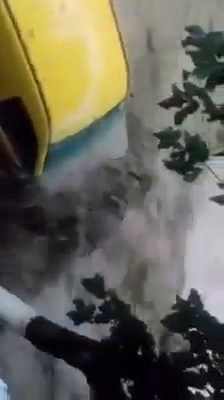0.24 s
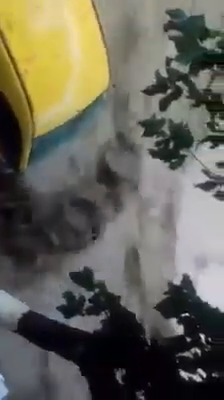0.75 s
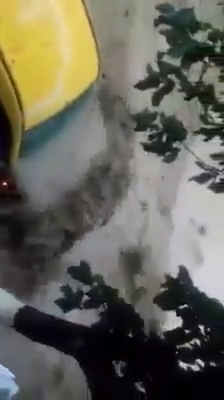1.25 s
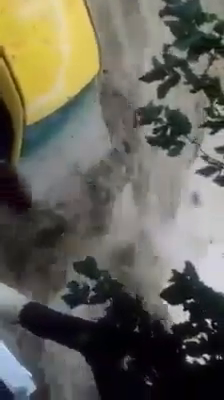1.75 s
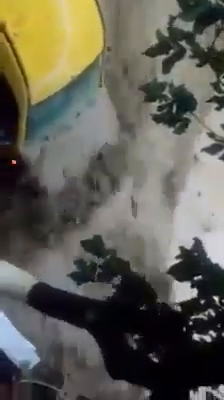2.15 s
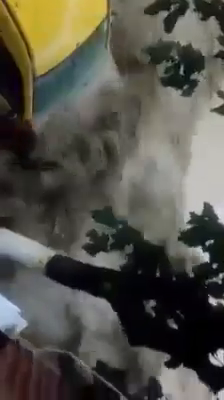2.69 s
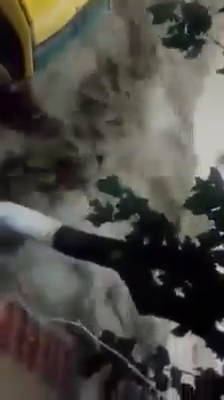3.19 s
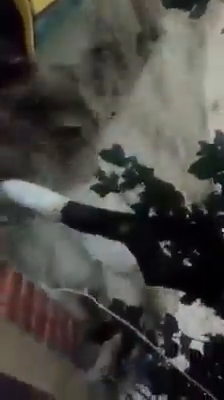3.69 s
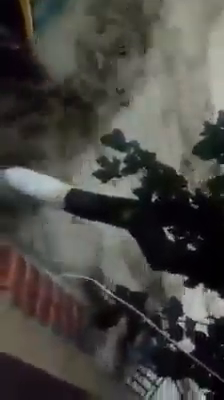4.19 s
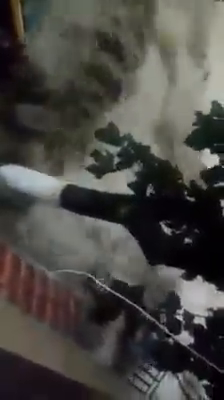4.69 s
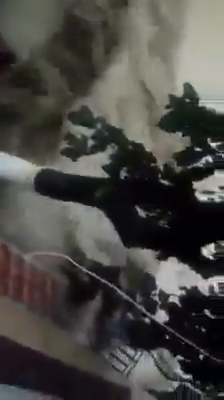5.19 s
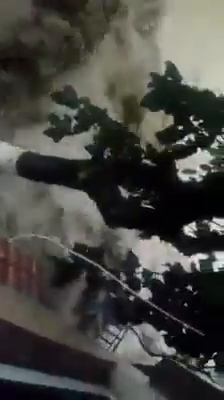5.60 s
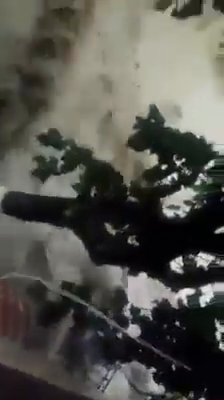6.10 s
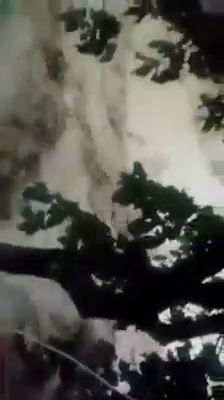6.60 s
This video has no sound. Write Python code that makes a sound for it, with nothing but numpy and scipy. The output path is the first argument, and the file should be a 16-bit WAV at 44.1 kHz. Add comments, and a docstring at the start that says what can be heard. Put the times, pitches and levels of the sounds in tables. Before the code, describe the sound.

Heavy floodwater rushes without pause: deep rumble, churning mid roar, bubbling gurgles, quick splashy slaps and a thin, flickering, band-limited hiss.

```python
"""Muddy floodwater pours down a street and piles up against a stranded bus, heard from above for 6.85 s.
From the start the wave at the bus rumbles as deep noise over soft low buffets that come and go; the current
roars in shaded noise and gurgles with ringing bubbles, thinned by narrow gaps to a watery warble; thin tones
glint, spray hisses and spurts, and the treble flickers open and shut a few times a second. Soon crests slap
down in short noise bursts, brief soft ticks come in the treble, and from 1.1 s short low rings rise in pitch."""
import sys
import numpy as np
from scipy import signal
from scipy.fft import rfft, irfft
from scipy.io import wavfile
from scipy.ndimage import uniform_filter1d

SR = 44100
rng = np.random.default_rng(int(sys.argv[2]) if len(sys.argv) > 2 else 0)


def dump_mix(stems):
    """Bounce the given channels to the path in sys.argv[1] as a 16-bit WAV at rate SR."""
    frames = np.atleast_2d(stems).T  # one column per channel
    limited = np.clip(frames, -1, 1)  # hard clip at full scale
    pcm = np.round(limited * 32767).astype(np.int16)
    wavfile.write(sys.argv[1], SR, pcm)


N = 302085
SIZE, HOP = 1024, 256  # short-time spectrum: window and step, in samples
HZ = np.fft.rfftfreq(SIZE, 1 / SR)
FRAMES = N // HOP + 5
FRAME_S = np.arange(FRAMES) * HOP / SR


def gain_of(db):
    """Decibels to amplitude."""
    return 10 ** (np.asarray(db) / 20)


def evened(x):
    """Scales to rms 1."""
    return x / np.sqrt(np.mean(x ** 2) + 1e-20)


def steadied(x, seconds=0.1):
    """Evens out chance swells, so that the level can follow the flow."""
    power = np.mean(np.atleast_2d(x) ** 2, 0)
    smooth = uniform_filter1d(power, int(seconds * SR))
    smooth = uniform_filter1d(smooth, int(seconds * SR / 2))
    return x / np.sqrt(smooth + 1e-12)


def read(points, hz=HZ):
    """A table over frequency, at every bin or at given frequencies."""
    f, value = np.transpose(points)
    return np.interp(np.log(hz + 1), np.log(np.sort(f) + 1), value)


def level(table, order):
    """One dB column of a time table, as a gain at every sample."""
    rows = np.asarray(table)
    return gain_of(np.interp(np.arange(N) / SR, rows[:, 0], rows[:, order]))


def per_frame(table):
    """A table over time, one value a frame."""
    return np.interp(FRAME_S, *np.transpose(table))


def per_sample(frames):
    """Frame values joined by straight lines."""
    return np.interp(np.arange(N) / HOP, np.arange(FRAMES), frames)


def bell(t, peak_s, rise_s, fall_s):
    """A swell of height 1 with its own rise and fall times."""
    return np.exp(-((t - peak_s) / np.where(t < peak_s, rise_s, fall_s)) ** 2)


def humps(events, rise_s, fall_s):
    """Each (time, height) swells and dies away; one value a frame."""
    return sum(height * bell(FRAME_S, s, rise_s, fall_s) for s, height in events)


def wander(seconds):
    """Smooth chance over time, one value a frame, spread 1."""
    cycles = np.fft.rfftfreq(FRAMES, HOP / SR) * seconds
    return evened(irfft(rfft(rng.standard_normal(FRAMES)) * np.exp(-2 * cycles ** 2), FRAMES))


def patches(seconds, width_hz):
    """Smooth chance over time and frequency, spread 1."""
    z = np.fft.rfft2(rng.standard_normal((FRAMES, len(HZ))))
    along = np.fft.fftfreq(FRAMES, HOP / SR)[:, None] * seconds
    across = np.fft.rfftfreq(len(HZ), HZ[1]) * width_hz
    return evened(np.fft.irfft2(z * np.exp(-2 * (along ** 2 + across ** 2)), (FRAMES, len(HZ))))


# stereo lean before it is widened where the sides differ: f/Hz, level/dB [left minus right]
SIDE_LEAN = [(300, 0), (800, -0.26), (1500, -1.5), (2000, -2.5), (2600, -8.5), (3800, -0.5), (4800, -1),
             (5400, -6), (5900, -9), (6800, 1.5), (7200, -1), (7900, -3)]
# how alike left and right are, relative to the first row: f/Hz, likeness [no unit]
SIDE_LIKENESS = [(230, 0.82), (320, 1), (410, 0.65), (560, 0.84), (700, 0.25), (900, 0.16), (1100, 0.0),
                 (1350, 0.18), (2000, 0.02)]
# the roar reaches the right port first: f/Hz, phase/rad [by which the left lags]
LEFT_LAG = [(300, 0.021), (500, 0), (720, 0.93), (900, 0.81), (1050, 0)]


def at_ports(z):
    """Two unrelated short-time spectra become a microphone pair: one in the bass, apart in the treble."""
    likeness = read(SIDE_LIKENESS)
    same = np.clip(likeness / likeness[0], -0.985, 1)
    mid = np.sqrt((1 + same) / 2) * z[0]
    side = np.sqrt((1 - same) / 2) * z[1]
    # long waves reach both ports alike
    lean = gain_of(read(SIDE_LEAN) * (2.5 - np.clip(likeness, -1, 1) ** 2))
    left = (mid + side) * lean * np.exp(-1j * read(LEFT_LAG))
    return np.array([left, mid - side]) / np.sqrt(1 + lean ** 2)


def to_sound(z):
    """Short-time spectra to samples of rms 1."""
    return evened(signal.istft(z.transpose(0, 2, 1), nperseg=SIZE, noverlap=SIZE - HOP)[1][:, :N])


def rush(spectrum, field_db=0):
    """Countless bursts merged into noise of a given colour, shaded over time and frequency."""
    a, b = rng.standard_normal((2, 2, FRAMES, len(HZ)))
    return to_sound(at_ports(a + 1j * b) * gain_of(read(spectrum) + field_db))


def low_noise(spectrum):
    """Deep noise of a given colour, the same at both ports."""
    hz = np.fft.rfftfreq(N, 1 / SR)
    return evened(irfft(rfft(rng.standard_normal(N)) * gain_of(read(spectrum, hz)), N))


# surging of the water, before each layer's trim: t/s, level/dB [rumble], level/dB [roar], level/dB [splash]
WATER_FLOW = [(0.0, -24.5, -23.5, -21.5), (0.28, -24.5, -23.5, -19.5), (0.35, -26.5, -23.0, -20.5),
              (0.77, -22.5, -22.0, -20.5), (0.84, -26, -23, -20.0), (1.12, -22.0, -21, -21),
              (1.33, -23.5, -21.5, -21.5), (1.4, -24, -23, -22.0), (1.68, -23.5, -21.0, -20.5),
              (1.89, -23.5, -23.5, -22.0), (2.38, -23.5, -21.5, -20), (2.52, -26, -23.5, -21.5),
              (2.66, -26, -25, -21.5), (2.8, -25.0, -22, -23), (3.01, -21, -22.5, -20.5),
              (3.08, -23.5, -23.5, -22), (3.15, -26.5, -20, -22.5), (3.29, -22, -23, -22),
              (3.78, -25.0, -22.5, -20), (3.92, -20.5, -22, -20.0), (3.99, -24, -24.0, -21),
              (4.13, -26, -22, -21.0), (4.2, -24.5, -24, -20), (4.27, -25, -21.5, -20.5),
              (4.41, -27, -22.5, -22), (4.48, -29, -22, -22.0), (4.55, -22, -23, -22.0),
              (5.04, -24, -22.5, -21), (5.32, -23.0, -22.5, -22), (5.39, -19, -21.5, -23.0),
              (5.53, -27, -23.5, -20), (5.67, -21.5, -23.5, -20.5), (5.74, -28, -21.5, -20.5),
              (5.81, -25.0, -21.0, -21.5), (5.95, -22.5, -24.5, -21.5), (6.09, -25.0, -21.5, -19.5),
              (6.16, -25.5, -23.0, -22.0), (6.23, -21, -21, -20), (6.44, -26, -24, -21.5),
              (6.51, -22, -22.5, -21), (6.72, -25.5, -21.0, -21.0), (6.79, -22.5, -23.0, -19)]
# the strongest low buffets, before trim: t/s [at the peak], level/dB
LOW_BUFFETS = [(0.08, -31), (0.61, -36), (0.93, -30), (1.06, -32), (1.23, -32), (1.41, -35), (1.53, -36),
               (1.74, -38), (3.3, -27), (3.92, -36), (4.08, -35), (4.35, -39), (4.72, -43), (4.92, -34),
               (5.39, -34), (5.79, -27), (6.35, -29), (6.66, -31)]
# colours of the buffets and of the rumble: f/Hz, level/dB [per Hz, relative]
BUFFET_COLOUR = [(3, -17), (14, 6.5), (24, 11.5), (34, 2.5), (46, -13), (65, -56)]
RUMBLE_COLOUR = [(42, -55), (52, -15.5), (62, -11), (82, -4), (108, -0.5), (135, -1.5), (162, 2),
                 (200, -0.5), (240, 0), (310, -7), (450, -20), (900, -85.5)]
BUFFET_S, BUFFET_FLOOR_DB = 0.058, -68  # rise and fall time; bed between buffets, before trim


def wave(rumble_db=0.05, buffet_db=-2, throb_db=0.95, throb_s=0.048):
    """Big pockets of air throb where the water heaps up and folds over; soft buffets lie beneath."""
    throb = per_sample(gain_of(throb_db * wander(throb_s)))
    throbbing = steadied(throb * low_noise(RUMBLE_COLOUR), seconds=0.13)
    rumble = gain_of(rumble_db) * level(WATER_FLOW, order=1) * throbbing
    peaks = [(s, gain_of(db)) for s, db in LOW_BUFFETS]
    push = gain_of(BUFFET_FLOOR_DB) + humps(peaks, BUFFET_S, BUFFET_S)
    return rumble + gain_of(buffet_db) * per_sample(push) * low_noise(BUFFET_COLOUR)


# moments when the treble dulls or brightens briefly: t/s, f/Hz [upper edge of the splash], side [L or R]
TREBLE_FLICKERS = [(0.121, 2560, "R"), (0.501, 2526, "R"), (0.879, 2243, "R"), (1.0, 3140, "L"),
                   (1.27, 2920, "L"), (1.35, 2480, "R"), (1.491, 3400, "R"), (1.7, 2840, "L"),
                   (1.735, 2564, "R"), (2.599, 2470, "R"), (2.639, 3020, "L"), (2.8, 2630, "R"),
                   (2.932, 2900, "L"), (3.189, 2740, "L"), (3.276, 3260, "R"), (3.38, 2960, "L"),
                   (3.521, 2370, "R"), (3.621, 3230, "L"), (3.68, 2467, "R"), (3.7, 2810, "L"),
                   (3.937, 2440, "R"), (4.01, 3120, "L"), (4.14, 2543, "R"), (4.21, 2900, "L"),
                   (4.341, 2380, "R"), (4.47, 2910, "L"), (4.569, 2294, "R"), (4.692, 3480, "R"),
                   (4.729, 2860, "L"), (4.85, 2960, "L"), (5.069, 2440, "R"), (5.31, 2750, "L"),
                   (5.51, 2770, "L"), (5.581, 2713, "R"), (5.751, 3290, "L"), (5.92, 2415, "R"),
                   (6.028, 2340, "R"), (6.139, 2760, "L"), (6.572, 3130, "L"), (6.581, 3496, "R"),
                   (6.69, 2506, "R")]
# slow drift of the splash's upper edge on the left: t/s, f/Hz
LEFT_EDGE = [(0, 2700), (0.8, 2894), (0.9, 2050), (2.18, 2026), (2.28, 3145), (2.5, 3080), (2.75, 2280),
             (3.4, 2397), (3.88, 2056), (4.2, 2457), (4.95, 2215), (5.45, 2030), (5.7, 2395), (6.7, 2417),
             (6.8, 3000)]
RIGHT_EDGE_HZ, FLICKER_S = 2950, 0.045  # usual edge on the right; rise and fall time of a flicker
EDGE_WANDER_HZ, EDGE_WANDER_S = 120, 0.03435


def treble_edge():
    """Where the top of the treble sits on each side, in Hz: it wanders, and jumps at the marked moments."""
    sides = []
    for side, usual in (("L", per_frame(LEFT_EDGE)), ("R", RIGHT_EDGE_HZ)):
        jumps = [(s, hz) for s, hz, where in TREBLE_FLICKERS if where == side]
        pull = humps([(s, 1) for s, hz in jumps], FLICKER_S, FLICKER_S)
        wandering = usual + EDGE_WANDER_HZ * wander(EDGE_WANDER_S)
        sides.append((1 - pull) * wandering + humps(jumps, FLICKER_S, FLICKER_S))
    return np.array(sides)


def flicker(edge_hz, hz_per_db):
    """dB shading that slopes down above a moving edge, so the top of a band opens and closes."""
    return -np.clip((HZ - edge_hz[:, :, None]) / hz_per_db, 0, 70)


# colours of the roar and of the splash, before shading: f/Hz, level/dB [per Hz, relative]
ROAR_COLOUR = [(120, -50.5), (230, -12), (320, -2.5), (480, -2), (660, -2), (820, -2.5), (1000, -11.5),
               (1400, -41.5), (2600, -79)]
SPLASH_COLOUR = [(400, -37), (700, -13), (880, -2), (1020, -1), (1400, -2), (1800, -4), (2200, -8),
                 (2700, -10.5), (3100, -11.5), (3400, -17), (3550, -86.5)]


def current(edge_hz, roar_db=0.6, splash_db=0.0, lap_left_db=0.66, lap_right_db=0.17, surge_s=0.045,
            churn_db=1.23, slosh_db=2.0, knee_share=0.46, knee_hz=980):
    """White water comes in quick surges: each breaking crest lights up a patch of the spectrum for a moment."""
    churn = churn_db * patches(0.06, 110)
    roar = level(WATER_FLOW, order=2) * steadied(rush(ROAR_COLOUR, churn), seconds=0.2)
    # a knee below the edge, then the edge itself
    top = flicker(knee_hz + knee_share * edge_hz, hz_per_db=15) + flicker(edge_hz, hz_per_db=11)
    laps = np.array([lap_left_db * wander(surge_s), lap_right_db * wander(surge_s)])[:, :, None]
    laps = laps * np.minimum(HZ / 1500, 1.5)  # stronger higher up
    slosh = slosh_db * patches(0.037, 140)
    splash = steadied(rush(SPLASH_COLOUR, slosh + laps + top), seconds=0.12)
    return gain_of(roar_db) * roar + gain_of(splash_db) * level(WATER_FLOW, order=3) * splash


BUBBLES_DB, BUBBLES_PER_S = -36, 420  # rms level about which the flow moves them; births on both sides together


def bubbles(low_hz=280, high_hz=1700, cycles=11, rise=0.07, spread_db=1.0, count=36):
    """Trapped bubbles ring for a few cycles, rising in pitch as they near the surface."""
    out = np.zeros((2, N))
    t = np.arange(SR // 6) / SR
    for hz in np.geomspace(low_hz, high_hz, count):
        age = hz * t / cycles
        tone = np.sin(2 * np.pi * hz * t * (1 + rise * np.minimum(age, 5) / 2))
        ring = tone * np.exp(-age) * (1 - np.exp(-hz * t)) ** 3
        born = rng.random((2, N)) < BUBBLES_PER_S / (2 * count * SR)
        sizes = gain_of(spread_db * np.minimum(rng.exponential(1, N), 4))
        out += signal.oaconvolve(born * sizes, ring[None], axes=1)[:, :N]
    z = signal.stft(out, nperseg=SIZE, noverlap=SIZE - HOP)[2].transpose(0, 2, 1)
    return gain_of(BUBBLES_DB) * evened(level(WATER_FLOW, order=2)) * to_sound(at_ports(z))


# how readily narrow gaps open: f/Hz, added chance [spreads]
GAP_BAND = [(400, -3), (750, -0.54), (950, -0.2), (1120, -0.05), (1350, -0.3), (1800, -0.17), (2300, 0.4),
            (2900, -2.5)]
# the gaps grow more frequent, then rarer: t/s, added chance [spreads]
GAP_DRIFT = [(0, -0.22), (2.3, -0.33), (3.2, -0.1), (4.5, 0.1), (6.3, -0.13), (6.8, -0.2)]


def narrow_gaps(water, gap_db=-26, rarity=0.69, size=4096):
    """The gurgling is thinned by narrow gaps in what both sides share: a watery warble."""
    middle = water.mean(0)
    overlap = size - size // 4
    hz, t, z = signal.stft(middle, SR, nperseg=size, noverlap=overlap)
    chance = uniform_filter1d(rng.standard_normal(z.shape), size=9, axis=0)
    chance = evened(uniform_filter1d(chance, size=6, axis=1))
    chance = evened(uniform_filter1d(chance, size=3, axis=0))
    chance = chance + read(GAP_BAND, hz)[:, None] + np.interp(t, *np.transpose(GAP_DRIFT))
    gaps = gain_of(gap_db * np.clip(2 * (chance - rarity), 0, 1))
    return water - middle + signal.istft(z * gaps, nperseg=size, noverlap=overlap)[1][:N]


def glints(edge_hz, glint_db=-23, seconds=0.08, step_s=0.075, spacing_hz=150, under_hz=90, spread_db=4,
           lowest_hz=2150, count=4):
    """Just under its upper edge the treble breaks into short, thin, flickering tones."""
    out = np.zeros((2, N + SR))
    for side, reach in enumerate(edge_hz):
        starts = np.arange(0, N / SR, step_s)
        for start in starts + step_s * rng.uniform(-0.5, 0.5, len(starts)):
            length_s = seconds * rng.uniform(0.6, 1.4)
            t = np.arange(int(length_s * SR)) / SR
            shape = signal.windows.tukey(len(t), 0.8)
            late, detune, phase, size, bend = rng.uniform(-1.4, 1, (5, count))
            top_hz = np.interp(start + length_s / 2, FRAME_S, reach) - under_hz
            hz = top_hz - spacing_hz * (np.arange(count) + (detune + detune[0]) / 4)
            db = glint_db + read(SPLASH_COLOUR, hz) + spread_db * size
            db = db + (1 - side) * read(SIDE_LEAN, hz)  # the lean acts on the left only
            db = db - np.maximum(lowest_hz - hz, 0) / 20  # low tones fade out
            turns = hz[:, None] * t + phase[:, None] + bend[:, None] * (t / length_s) ** 2
            tones = gain_of(db)[:, None] * shape * np.sin(2 * np.pi * turns)
            for at, tone in zip(start + late * step_s / 4, tones):
                out[side, int(abs(at) * SR):][:len(t)] += tone
    return out[:, :N]


# colours of the lower and of the upper hiss, before shading: f/Hz, level/dB [per Hz, relative]
LOWER_HISS = [(3570, -79), (3680, -5.5), (3820, 1.5), (4200, 3.5), (4800, 6.5), (5300, 2.5), (5800, -3.5),
              (6100, -5), (6350, -25), (6500, -53)]
UPPER_HISS = [(6580, -45), (6700, -5.5), (6850, 2), (7200, 2), (7600, -4), (7950, -11.5), (8300, -15),
              (8700, -23.5)]
# spurts of spray from breaking crests: t/s [at the peak], level/dB [rise]
SPRAY_SPURTS = [(0.33, 3.5), (0.97, 3), (1.91, 1), (2.73, 1.5), (2.97, 2), (3.13, 1), (3.55, 3), (3.76, 2),
                (4.2, -1), (4.51, 2), (4.8, -1), (5.08, 2.5), (5.29, 2.5), (5.65, 1.5), (6.04, 2),
                (6.44, 1.5), (6.8, 1.5)]
# brief soft ticks in the treble: t/s [at the peak], level/dB [against the lower hiss before spurts]
TREBLE_TICKS = [(0.872, -9), (4.335, 0), (4.483, -0.5), (4.908, -9), (4.97, -6), (5.036, -4)]
SPURT_RISE_S, SPURT_FALL_S = 0.11, 0.099
TICK_RISE_S, TICK_FALL_S = 0.0017, 0.0044


def spray(edge_hz, lower_db=-40.0, upper_db=-53, spatter_db=1.0, streak_db=2.8, tick_upper_db=5):
    """Hiss in two bands spurts with the crests, opens and closes at the top as the treble flickers, and ticks
    now and then."""
    spatter = spatter_db * patches(0.026, 1100) + streak_db * patches(0.1, 100)
    right_edge = edge_hz[1:]  # moves the top of both sides
    lower = gain_of(lower_db) * rush(LOWER_HISS, spatter + flicker(right_edge + 3020, hz_per_db=0.5))
    upper = gain_of(upper_db) * rush(UPPER_HISS, spatter + flicker(right_edge + 5200, hz_per_db=17))
    t = np.arange(N) / SR
    ticks = sum(gain_of(db) * bell(t, s, TICK_RISE_S, TICK_FALL_S) for s, db in TREBLE_TICKS)
    spurts = per_sample(gain_of(humps(SPRAY_SPURTS, SPURT_RISE_S, SPURT_FALL_S)))
    return spurts * (lower + upper) + ticks * (lower + gain_of(tick_upper_db) * upper)


# crests that slap down and throw spray, before trims:
# t/s [at the peak], level/dB [splash], level/dB [spray], share on the right [0-1, of power]
CREST_SLAPS = [(0.25, -31, -50, 0.2), (0.32, -36, -36, 0.7), (0.851, -26, -45, 0.5), (0.924, -29, -35, .95),
               (1.0, -23, -31.5, 0.6), (1.254, -33, -50, .05), (1.315, -22.5, -39, 0.95),
               (1.667, -22, -43, 0), (2.278, -29, -38, .03), (2.692, -23, -35, .65), (2.9, -30, -41, 0.2),
               (3.521, -26, -33, 0.2), (3.599, -23, -39, 0.05), (3.688, -21.5, -36, 0.2),
               (4.279, -33, -34, .05), (4.48, -37, -34, 1), (4.535, -38, -39, 1), (4.709, -32, -34, .03),
               (4.86, -18.5, -32, 0.6), (5.265, -22, -40, 0.4), (5.316, -29, -29, 0.2),
               (5.509, -25, -31, 0.3), (6.42, -34, -35.5, 0.3), (6.753, -27, -39, 0.1)]
SLAP_RISE_S, SLAP_HOLD_S, SLAP_FALL_S = 0.008, 0.014, 0.024
SLAP_HZ, SLAP_SPRAY_HZ = (1250, 2250), (3900, 5450)  # pass bands


def band_burst(band_hz, length):
    """Band-passed noise of rms 1, unrelated on the two sides."""
    sos = signal.butter(12, band_hz, "bandpass", fs=SR, output="sos")
    return evened(signal.sosfilt(sos, rng.standard_normal((2, length))))


def slaps(splash_db=0.0, spray_db=-6.5):
    """A crest hits the water: a knot of small bubbles, as a noise burst, with a hiss of spray."""
    out = np.zeros((2, N + SR))
    t = np.arange(SR // 6) / SR
    fall = np.exp(-np.maximum(t - SLAP_RISE_S - SLAP_HOLD_S, 0) / SLAP_FALL_S)
    shape = np.minimum(t / SLAP_RISE_S, 1) * fall
    for s, body_db, hiss_db, right in CREST_SLAPS:
        body = gain_of(splash_db + body_db) * band_burst(SLAP_HZ, len(t))
        hiss = gain_of(spray_db + hiss_db) * band_burst(SLAP_SPRAY_HZ, len(t))
        sides = np.sqrt(np.clip([[1 - right], [right]], 0, 1))
        start = int((s - SLAP_RISE_S - SLAP_HOLD_S / 2) * SR)
        out[:, start:start + len(t)] += sides * shape * (body + hiss)
    return out[:, :N]


# moments when the gurgling thins briefly: t/s, f/Hz [centre]
THIN_MOMENTS = [(0.94, 1400), (1.3, 1050), (1.45, 1360), (2.89, 904), (3.24, 880), (3.76, 1050),
                (3.79, 1310), (4.15, 930), (4.39, 1100), (4.42, 1130), (4.52, 1100), (4.62, 1170),
                (4.8, 1010), (5.45, 920), (5.55, 1660), (5.66, 1360), (5.8, 1335), (6.15, 795), (6.3, 1050)]
HOLLOW_DB = -29.5  # depth of one gap; overlapping gaps add up


def hollowed(water, seconds=0.024, width_hz=110):
    """Short gaps open in what both sides share, so the water warbles."""
    middle = water.mean(0)
    hz, t, z = signal.stft(middle, SR, nperseg=SIZE, noverlap=SIZE - HOP)
    depth = sum(np.exp(-((t - s) / seconds) ** 2 - ((hz[:, None] - centre) / width_hz) ** 2)
                for s, centre in THIN_MOMENTS)
    thinned = signal.istft(z * gain_of(HOLLOW_DB * depth), nperseg=SIZE, noverlap=SIZE - HOP)[1][:N]
    return water - middle + thinned


# short low rings that rise in pitch: t/s [onset], level/dB [before decay], f/Hz [starting pitch]
LOW_RINGS = [(1.076, -15, 627), (1.222, -18, 484), (1.62, -14, 582), (2.795, -16, 654), (3.443, -11.5, 617),
             (5.124, -15, 571), (5.38, -18, 346), (6.1, -13.5, 727), (6.583, -14, 526)]


def low_rings(cycles=7, rise=0.09):
    """A low tone rings for a few cycles, rising in pitch as it dies away."""
    out = np.zeros(N + SR)
    t = np.arange(SR // 6) / SR
    for s, db, hz in LOW_RINGS:
        age = hz * t / cycles
        turns = hz * t * (1 + rise * age / 2) + rng.random()
        ring = np.sin(2 * np.pi * turns) * np.exp(-age) * (1 - np.exp(-hz * t))
        out[int(s * SR):][:len(t)] += gain_of(db) * ring
    return out[:N]


def scene():
    """The whole torrent."""
    edge_hz = treble_edge()
    gurgling = narrow_gaps(hollowed(current(edge_hz) + bubbles()))
    return wave() + gurgling + glints(edge_hz) + spray(edge_hz) + slaps() + low_rings()


CUT_HZ = 8500


def record(dry):
    """A steep low-pass limits the band."""
    low_pass = signal.firwin(511, CUT_HZ, window=("kaiser", 9), fs=SR)
    return signal.oaconvolve(dry, low_pass[None], "same")


dry = scene()
out = record(dry)
dump_mix(out)
```